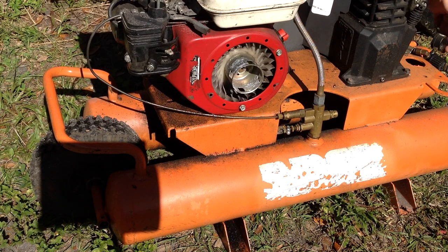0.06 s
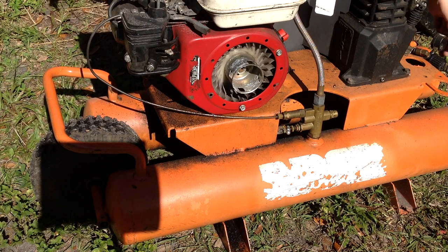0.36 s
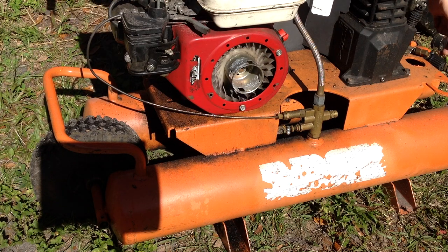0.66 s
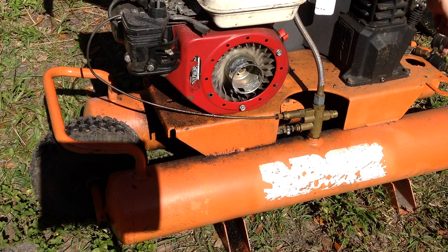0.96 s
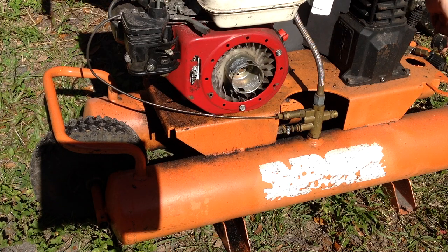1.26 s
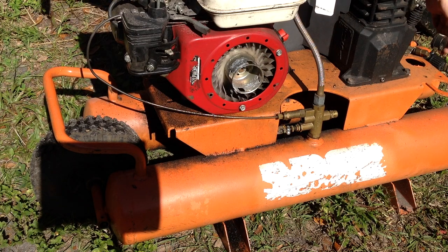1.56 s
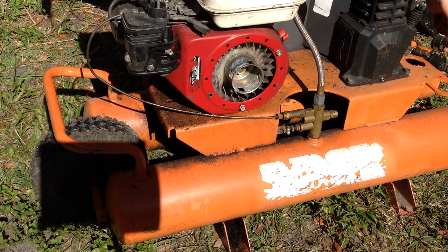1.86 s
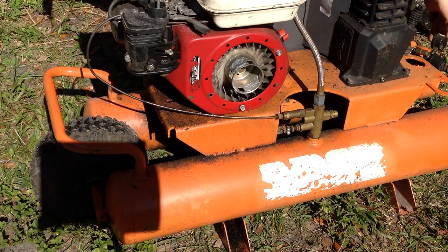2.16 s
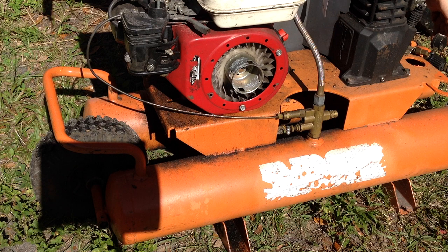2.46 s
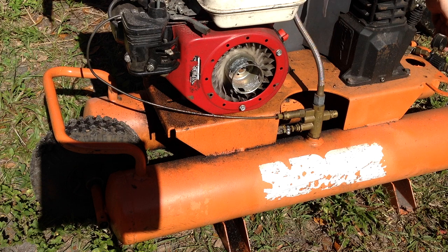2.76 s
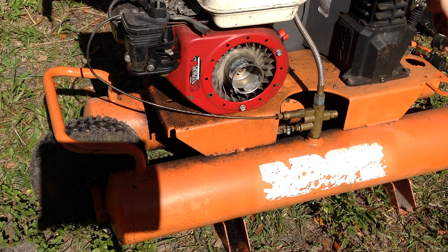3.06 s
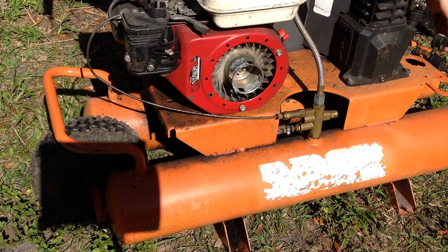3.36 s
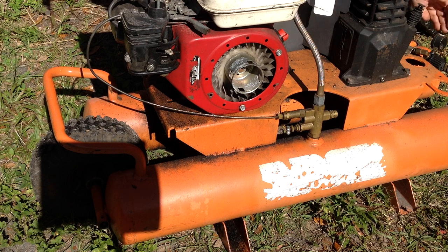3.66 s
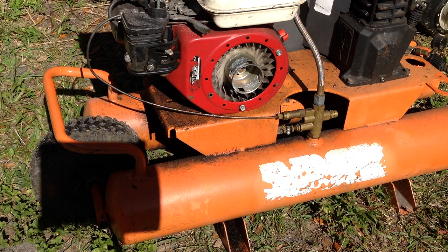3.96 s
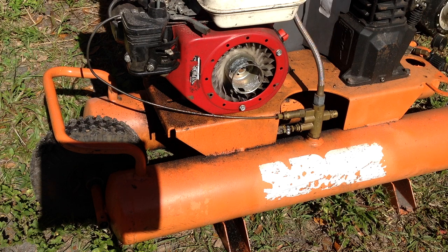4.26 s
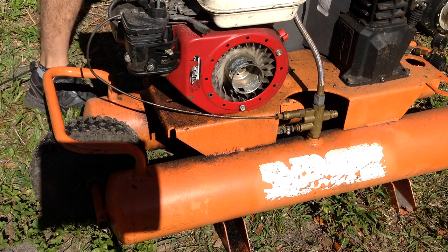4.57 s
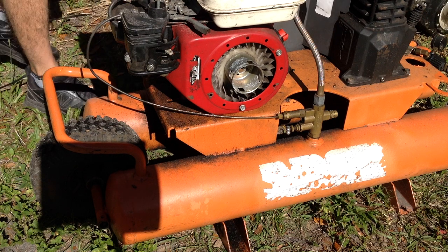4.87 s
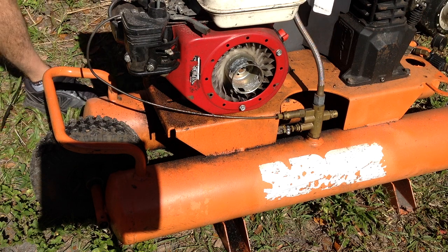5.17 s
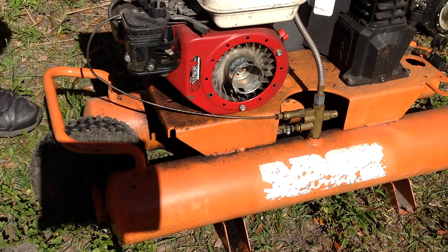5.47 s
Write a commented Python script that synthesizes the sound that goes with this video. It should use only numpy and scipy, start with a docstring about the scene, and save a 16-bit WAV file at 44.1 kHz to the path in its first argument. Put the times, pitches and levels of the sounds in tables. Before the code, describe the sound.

Compressed air leaks from the brass fittings of a parked compressor outdoors, about a metre away. A bright, high hiss is present from the start and continues for the whole five and a half seconds, easing only slightly. It has a rapid flutter, a fine sizzle and a thin, shifting, whistly ring, over a softer, even hiss of seeping air. Small irregular spurts lift it throughout, for example around 0.5, 1.8, 2.6, 3.2 and 4.1 seconds. Brief slight dips come near 1.7, 2 and 4.3 seconds, but the air never stops. The strongest short spurts arrive at about 5.1, 5.3 and 5.5 seconds. Well beneath the leak, a low outdoor rumble swells gently, most around 1.8 seconds, along with a very faint wavering hum.

```python
"""A jet of compressed air leaks from the brass fittings of a parked compressor on a lawn, a metre away.
Its turbulence flutters, spurts and chokes, and drives the cavities of the fitting into resonance.
Under it, seeping air makes a steady hiss; reflections from the tank and frame comb-filter both.
Behind them are a low, swelling outdoor rumble and a faint hum."""
import sys
import numpy as np
from scipy import signal
from scipy.fft import rfft, irfft
from scipy.io import wavfile
from scipy.ndimage import map_coordinates

SR = 44100
rng = np.random.default_rng(int(sys.argv[2]) if len(sys.argv) > 2 else 0)


def to_wav(sig):
    """Store sig (one row per channel, or 1-D mono) as 16-bit WAV at the path in sys.argv[1].

    Samples outside -1..1 are clipped; the rate is SR.
    """
    pcm = np.clip(np.atleast_2d(sig), -1, 1) * 32767
    pcm = np.round(pcm).astype(np.int16)
    wavfile.write(sys.argv[1], SR, pcm.T)  # frames by channels


N = 243873
T = np.arange(N) / SR
FREQ = np.fft.rfftfreq(N, 1 / SR)

# broadband spectrum of the jet: f/Hz, relative level/dB
JET_SPECTRUM = [(500, -31), (1600, -17.5), (3000, -11), (3900, -10.5), (4250, -14), (4480, -12),
                (4650, -4.5), (4850, -6), (5100, -1.9), (6400, -1.5), (6760, -3.5), (7050, -1.5),
                (8000, -0.8), (8700, -0.5), (9600, 0), (10100, -2.5), (10600, -2.5), (12600, -4),
                (15200, -5)]
# spurts of the jet: onset t/s, duration/s, rise in level/dB
JET_SPURTS = [(0, 0.1, 1.1), (0.235, 0.17, 0.9), (0.39, 0.05, 2), (0.515, 0.1, 2), (0.69, 0.43, 1.45),
              (1.388, 0.088, 1.1), (1.65, 0.05, 0.8), (1.757, 0.081, 2.1), (1.88, 0.06, 1.7),
              (2.055, 0.1, 1.5), (2.238, 0.095, 0.9), (2.566, 0.035, 2.5), (2.93, 0.22, 1.4),
              (3.157, 0.22, 2), (3.51, 0.43, 1.2), (4.093, 0.18, 2.1), (4.55, 0.054, 2),
              (4.717, 0.065, 2.5), (5.114, 0.072, 4), (5.225, 0.071, 0.5), (5.342, 0.06, 3),
              (5.45, 0.11, 4)]
# chokes of the gap: onset t/s, duration/s, drop in level/dB
GAP_CHOKES = [(0.465, 0.04, 0.4), (0.635, 0.035, 0), (1.72, 0.02, 2), (1.98, 0.06, 1.5), (2.36, 0.06, 1.2),
              (3.415, 0.05, 1.3), (3.98, 0.08, 1.2), (4.3, 0.025, 2.6), (4.365, 0.025, 1.2),
              (4.48, 0.04, 1.3), (4.82, 0.11, 1)]
# modes of the fitting's body and its lower and upper cavities: f/Hz, width/Hz, relative level/dB
BODY_MODES = [(3010, 160, -7.5), (3173, 66, -5), (3375, 47, -4), (3800, 240, -3), (4050, 140, -6.5),
              (4389, 74, -7), (4570, 76, -6.5), (5020, 63, -2.5), (8060, 190, 0), (8300, 90, -7),
              (8430, 83, 1.5), (9130, 230, 0), (9380, 180, 2.5), (11750, 420, -5)]
LOWER_MODES = [(5744, 116, 3.5), (5800, 65, 1), (6040, 55, 3), (6180, 80, 4.5), (6280, 66, 3),
               (6400, 96, 2.8), (6540, 90, 0)]
UPPER_MODES = [(7040, 180, 0.5), (7300, 150, -4), (7460, 180, 1.5), (7770, 260, -0.5)]
# lean of the jet toward the lower cavity: t/s, level added to that cavity/dB
JET_LEAN = [(0, -4), (0.15, 1.5), (0.24, -5), (0.66, -5), (0.71, 0.5), (1.1, 2), (1.4, 0), (1.85, 0.5),
            (2.17, 1.5), (2.29, -5.5), (2.8, 2), (3.15, 0.5), (3.35, -0.5), (3.55, 1), (3.85, -0.5),
            (5.53, -0.5)]
# sizzle within the jet: t/s, relative level/dB
SIZZLE_ENVELOPE = [(0, -1.5), (0.3, -3), (0.8, -1.5), (1.3, -4.5), (1.9, -4.5), (2.25, -1), (2.45, -6),
                   (2.85, -5), (3.25, -1), (3.6, -3), (4.2, -5), (5.15, -2), (5.5, -6)]
# spectrum of the steady hiss: f/Hz, relative level/dB
HISS_SPECTRUM = [(200, -37), (450, -5), (1050, -1), (1580, -5.5), (2050, -1.5), (2310, -4), (2600, -5),
                 (3350, -2.5), (3950, -1.5), (4350, -3.5), (4700, -3), (6000, -1), (6750, -2.5), (7200, 0),
                 (14000, -1)]
# hollow, pipe-like modes in the hiss: f/Hz, width/Hz, relative level/dB
HOLLOW_MODES = [(2146, 140, -5), (2328, 130, -2)]
# rise and fall of the hollow ring: t/s, level/dB
HOLLOW_ENVELOPE = [(0, -65), (0.5, -57.5), (0.68, -61), (0.85, -57), (1.02, -63), (1.25, -59.5), (1.8, -61),
                   (2.1, -63), (2.4, -59.5), (2.7, -64), (3.3, -63), (3.47, -58.5), (3.62, -63), (4.2, -63),
                   (4.56, -59.5), (4.82, -60.5), (4.95, -56), (5.1, -62), (5.28, -58.5), (5.38, -61),
                   (5.53, -59)]
# spectrum of the outdoor rumble: f/Hz, relative level/dB
RUMBLE_SPECTRUM = [(25, -30), (46, -16), (65, -14), (76, -14), (90, -5), (135, -4.5), (185, -0.5),
                   (240, -2.5), (330, -5.5), (600, -10.5), (1200, -11), (3000, -52)]
# swells in the rumble: peak t/s, half duration/s, f/Hz, width/Hz, peak level/dB
RUMBLE_SWELLS = [(1.4, 0.16, 175, 70, -63), (1.8, 0.57, 225, 70, -61.3), (1.84, 0.11, 390, 300, -56.5),
                 (2.85, 0.41, 200, 55, -62.5), (3.98, 0.1, 190, 80, -62), (4.35, 0.45, 120, 28, -66),
                 (5.08, 0.28, 178, 70, -64)]
# tones of the hum: f/Hz, initial level/dB, final level/dB
HUM_TONES = [(147.4, -67, -73), (361, -76, -70.5)]


def undb(db):
    """Amplitude ratio of a level in decibels."""
    return 10 ** (np.asarray(db) / 20)


def unit(x):
    """Normalisation to rms 1."""
    return x / np.std(x)


def colour(points):
    """Frequency response interpolated through (f/Hz, level/dB) points on a log-frequency axis."""
    hz, db = np.transpose(points)
    return undb(np.interp(np.log(FREQ + 1), np.log(hz), db))


def resonances(modes):
    """Frequency response of steep-sided resonances, summed incoherently: their powers add."""
    return np.sqrt(sum(undb(db) ** 2 / (1 + ((FREQ - hz) / (0.54 * width)) ** 2) ** 2
                       for hz, width, db in modes))


def noise(response):
    """Source and filter: white noise takes on the spectrum of a frequency response."""
    return irfft(rfft(rng.standard_normal(N)) * response, N)


def walk(cutoff_hz):
    """Random modulation: low-passed noise of rms 1."""
    return unit(noise(1 / (1 + (FREQ / cutoff_hz) ** 4)))


def envelope(points):
    """Level contour, linear between (t/s, level/dB) points."""
    return np.interp(T, *np.transpose(points))


def held(events, attack_s=0.021, release_s=0.016):
    """Valve action of the gap: each change of level, in dB, sets in, holds and lets go."""
    return sum(db * np.clip((T - onset) / attack_s, 0, 1)
               * np.clip(1 - (T - onset - duration) / release_s, 0, 1)
               for onset, duration, db in events)


def jet(level_db=-38, sag_db_per_s=0.41):
    """Turbulent jet noise: its level follows the flow, and sinks slowly as the pressure falls."""
    choke_db = held(GAP_CHOKES)
    surge_db = held(JET_SPURTS) - choke_db + 0.11 * walk(24)
    air = noise(colour(JET_SPECTRUM)) + fitting(surge_db, choke_db) + sizzle(surge_db)
    chatter = undb(0.33 * walk(70))  # the chattering gap makes the stream flutter
    flutter = chatter * (1 + 0.22 * spits())
    return unit(air) * flutter * undb(level_db - sag_db_per_s * T + surge_db)


def fitting(surge_db, choke_db):
    """Forced resonance: body and cavities ring harder in a spurt and are damped in a choke."""
    drive_db = 0.2 * surge_db - 0.45 * choke_db
    lean_db = envelope(JET_LEAN)
    body = noise(resonances(BODY_MODES)) * undb(drive_db + 0.4 * walk(16) + 0.1)
    lower = cavity(LOWER_MODES) * undb(drive_db + lean_db + 0.6 * walk(22) + 1.3)
    # the upper cavity loses part of what the lower one gains
    upper = cavity(UPPER_MODES) * undb(drive_db - 0.51 * lean_db + 0.7 * walk(16) + 0.8)
    return body + lower + upper


def cavity(modes, drift_share=0.002, drift_rate_hz=6.01):
    """Cavity resonance: turbulence excites narrow modes whose pitch wanders slightly."""
    ring = noise(resonances(modes))
    warped_samples = np.cumsum(1 + drift_share * walk(drift_rate_hz))
    return map_coordinates(ring, [warped_samples], order=5, mode="wrap")


def sizzle(surge_db, surge_share=0.65):
    """The finest eddies radiate the highest frequencies; they follow only a share of each surge."""
    level_db = envelope(SIZZLE_ENVELOPE) - (1 - surge_share) * surge_db
    return noise(resonances([(12740, 4100, 0)])) * undb(level_db + 0.5 * walk(20))


def spits(per_s=95, decay_s=0.00089):
    """Moisture breaks up in the gap as a Poisson process: an envelope of tiny decaying bursts."""
    kicks = (rng.random(N) < per_s / SR) * rng.exponential(size=N)
    return signal.lfilter([1], [1, -np.exp(-1 / (decay_s * SR))], kicks)


def hiss(level_db=-43.5, choke_share=0.15):
    """Even seepage radiates broadband noise, pinched by chokes; a hollow resonance comes and goes."""
    seepage = unit(noise(colour(HISS_SPECTRUM)))
    seepage *= undb(level_db + 0.3 * walk(6.7) - choke_share * held(GAP_CHOKES))
    ring = unit(noise(resonances(HOLLOW_MODES))) * undb(envelope(HOLLOW_ENVELOPE))
    return seepage + ring


def metalwork(direct, echo_db=-16.5, min_delay_s=0.002, spread_s=0.012, count=14):
    """Comb filtering: short echoes from the tank and frame interfere with the direct sound."""
    echoes = sum(np.sign(polarity - 0.5) * np.exp(-2j * np.pi * FREQ * (min_delay_s + spread_s * lag))
                 for lag, polarity in rng.random((count, 2)))
    return irfft(rfft(direct) * (1 + undb(echo_db) * echoes / np.sqrt(count)), N)


def rumble(level_db=-57.5):
    """Distant low-frequency noise, with noise bands superposed that swell under Gaussian envelopes."""
    sound = unit(noise(colour(RUMBLE_SPECTRUM))) * undb(level_db + 0.22 * walk(4.7))
    for peak_s, half_s, hz, width, db in RUMBLE_SWELLS:
        band = unit(noise(resonances([(hz, width, 0)])))
        sound += band * np.exp(-((T - peak_s) / half_s) ** 2) * undb(db)
    return sound


def hum(waver_share=0.0081):
    """Two faint tones waver under slow, random frequency and amplitude modulation."""
    sound = np.zeros(N)
    for hz, start_db, end_db in HUM_TONES:
        phase = 2 * np.pi * np.cumsum(hz * (1 + waver_share * walk(6))) / SR
        level_db = np.linspace(start_db, end_db, N) + 1.5 * walk(3.2)
        sound += np.sqrt(2) * np.sin(phase) * undb(level_db)
    return sound


def scene():
    """Superposition of the leak, its reflections and the outdoor background, alike in both channels."""
    leak = metalwork(jet() + hiss())
    return np.tile(leak + rumble() + hum(), (2, 1))


def record(dry, bottom_hz=60, top_hz=15260):
    """Band limiting: a high-pass drops the deep bass and a steep low-pass cuts the top."""
    highpass = signal.butter(4, bottom_hz, "highpass", fs=SR, output="sos")
    lowpass = signal.ellip(12, 0.1, 75, top_hz, fs=SR, output="sos")
    return signal.sosfilt(lowpass, signal.sosfilt(highpass, dry))


dry = scene()
out = record(dry)
to_wav(out)
```